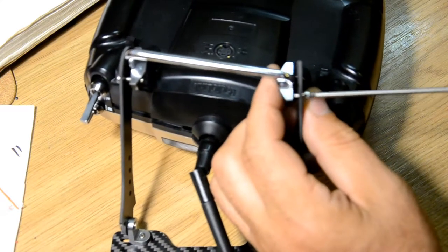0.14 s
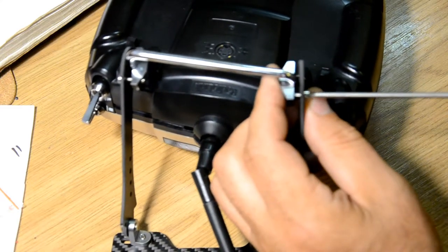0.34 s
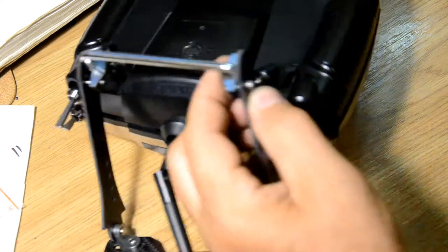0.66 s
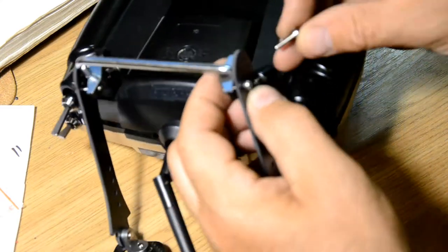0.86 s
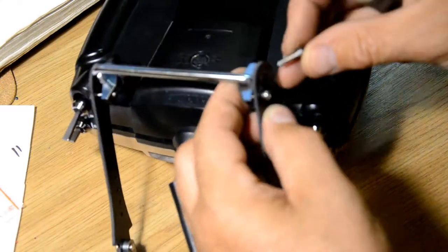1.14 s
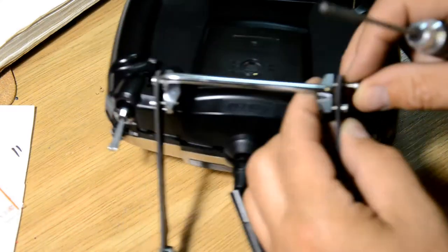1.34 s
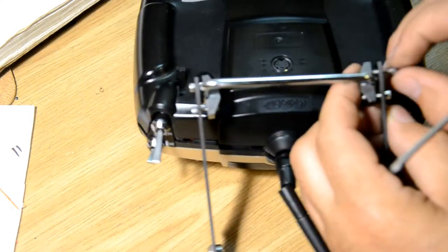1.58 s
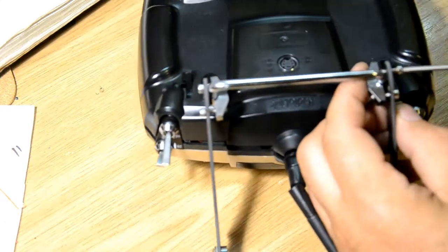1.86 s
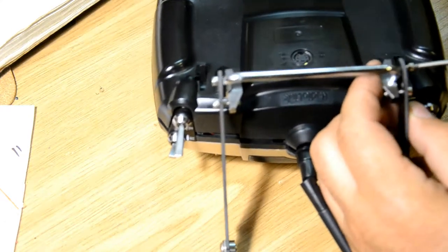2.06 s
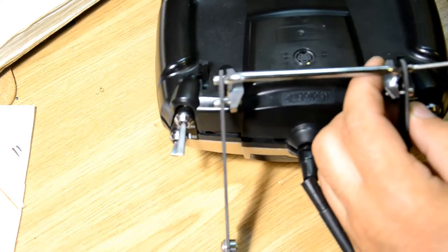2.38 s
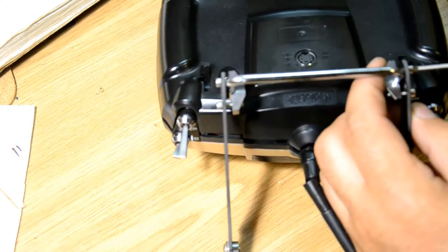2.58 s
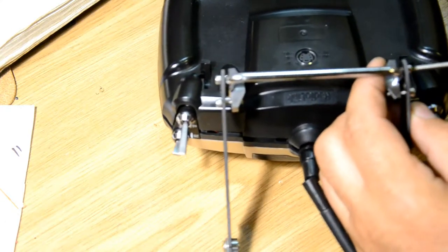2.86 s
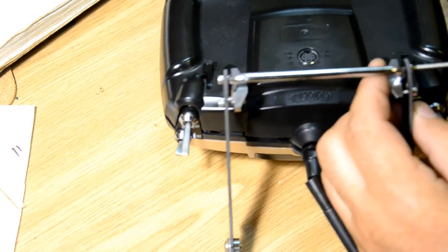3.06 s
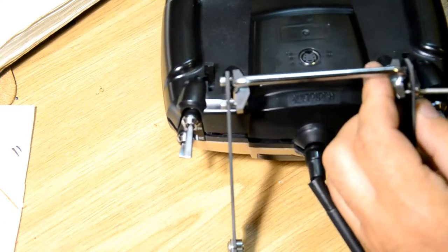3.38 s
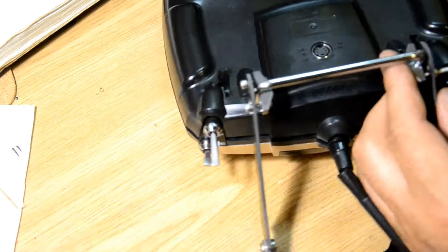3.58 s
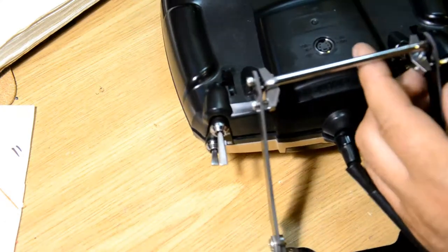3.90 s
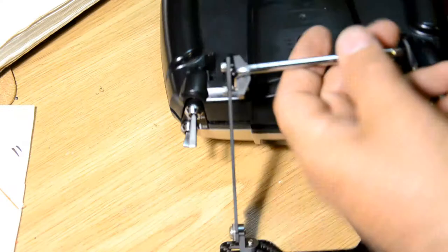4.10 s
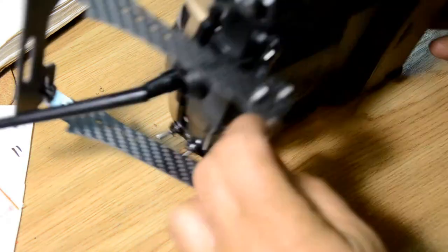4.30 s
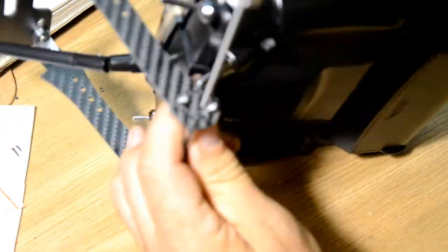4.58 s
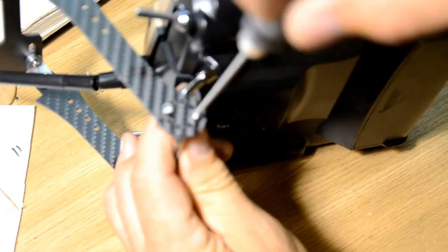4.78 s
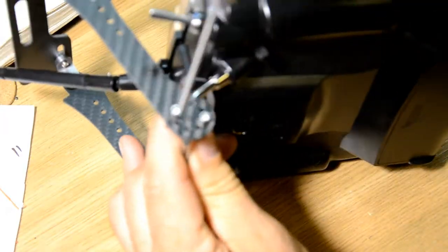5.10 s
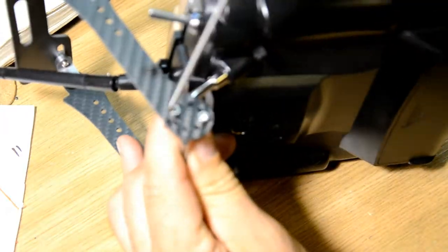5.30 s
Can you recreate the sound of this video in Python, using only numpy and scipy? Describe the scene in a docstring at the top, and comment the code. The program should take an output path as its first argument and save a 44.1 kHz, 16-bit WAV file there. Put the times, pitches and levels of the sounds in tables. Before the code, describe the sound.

A screwdriver ticks and scrapes on screws and a metal rod, and a plastic case knocks on a desk, with faint hiss underneath.

```python
"""Light taps and the rub of a tool along the hand are heard first: a screwdriver, screws and a bracket
rod are handled on a hollow plastic case on a desk. Each impact is a few milliseconds of chatter that
excites the modes of the case and ticks in the steel, which now and then rings briefly. A screw is driven
in by stick and slip, parts scrape, the case bumps on the desk, and a last sharp clack snaps brightly.
Under it all lie a low rumble and a dull, wavering hiss with a faint high whine."""
import sys
import numpy as np
from scipy import signal
from scipy.fft import rfft, irfft
from scipy.io import wavfile

SR = 44100
rng = np.random.default_rng(int(sys.argv[2]) if len(sys.argv) > 2 else 0)


def waveform_to_disk(signal):
    """Save audio, clipped to [-1, 1], as 16-bit WAV at the path in sys.argv[1]."""
    frames = np.transpose(np.atleast_2d(signal))
    scaled = np.clip(frames, -1, 1) * 32767
    samples = np.round(scaled).astype(np.int16)
    wavfile.write(sys.argv[1], SR, samples)


N = 240073
TIME, ALL_HZ = np.arange(N) / SR, np.fft.rfftfreq(N, 1 / SR)
SIZE = 4096  # samples in the frame of one impact; LAG is the time from its centre
LAG, HZ = (np.arange(SIZE) - SIZE // 2) / SR, np.fft.rfftfreq(SIZE, 1 / SR)
TO_10_MS = np.sqrt(.01 * SR / SIZE)  # gives a frame of rms 1 the energy of 10 ms at rms 1

# Distinct taps. Each row: time in seconds, spread in seconds, knock in dB, weight (low thump) and
# hardness (steel tick) in dB relative to the knock, two resonances of the spot touched in Hz.
TAPS = [(0.1175, 0.0018, -43.5, -20, -55, 810, 1060), (0.1864, 0.0034, -36.5, -35, -30, 780, 1570),
        (0.4354, 0.0022, -37, -37, -24, 1310, 1740), (0.5609, 0.002, -38.5, -16, -70.5, 720, 890),
        (1.3127, 0.0026, -45, -8, -37, 746, 1340), (1.335, 0.0041, -45, -8, -16.5, 970, 1830),
        (1.348, 0.0091, -45.5, -3, -19, 770, 1360), (1.436, 0.0045, -34, -19, -40.5, 520, 1210),
        (1.8137, 0.0043, -45, -29, -24, 990, 1190), (2.1832, 0.0061, -48, -4, -24, 584, 1070),
        (3.032, 0.0026, -44.5, -10, -31, 940, 1740), (3.0926, 0.0023, -45.5, -3.5, -34, 960, 1870),
        (3.486, 0.004, -50, 0, -38, 564, 700), (3.503, 0.003, -42, -10, -45, 593, 675),
        (3.5214, 0.0015, -50.5, -1, -30, 1650, 2340), (3.6045, 0.0011, -39, -30, -39, 1780, 1870),
        (3.609, 0.0019, -41, -29, -39, 710, 985), (3.6464, 0.0023, -47, -22, -46, 740, 1350),
        (3.772, 0.0021, -47.5, -24, -62, 775, 1130), (3.824, 0.003, -42, -15, -64, 500, 1360),
        (3.926, 0.0023, -46.5, -15, -60, 690, 990), (3.9462, 0.0021, -33, -18, -33.5, 1004, 1665),
        (3.952, 0.0023, -38, -21, -38, 1000, 1810), (4.058, 0.005, -43, 0.5, -47, 453, 990),
        (4.076, 0.0033, -34, -12, -37, 990, 1180), (4.082, 0.002, -39, -10, -43, 610, 1100),
        (4.1091, 0.002, -34, -4, -25.5, 610, 1500), (4.117, 0.0029, -33, -9, -29, 544, 1620),
        (4.1232, 0.0015, -24.5, -12, -32.5, 718, 1514), (4.1269, 0.0019, -26.5, -12, -33.5, 560, 1560),
        (4.137, 0.0025, -48, -6, -22, 850, 2450), (4.1468, 0.00088, -35.5, -8, -27, 910, 1420),
        (4.178, 0.005, -49, 2.5, -26, 700, 1410), (4.2695, 0.0011, -43.5, -6, -23.5, 1110, 1870),
        (4.2732, 0.0025, -39, -10, -29, 684, 1950), (4.477, 0.0043, -48, -9, -16.5, 600, 1470),
        (4.5259, 0.0046, -50, -5, -30, 1080, 1310), (4.695, 0.0028, -47.5, -4.5, -9, 556, 2070),
        (4.917, 0.0041, -54.5, -14, -18, 1110, 1500), (4.9422, .0054, -51.5, -5, -37, 1080, 1280),
        (5.1848, 0.0025, -44, -10, -33, 990, 1920), (5.225, 0.0023, -48.5, -7, -25.5, 675, 1260),
        (5.3226, 0.0017, -43.5, -5.5, -8, 950, 1290), (5.3296, 0.0024, -34, -29, -14, 1050, 1260),
        (5.333, 0.00094, -47, -13, -12, 1294, 1730), (5.421, 0.003, -47, -9, -47, 850, 1150)]
# Modes of the case. Each row: frequency in Hz, width in Hz, boost in dB.
CASE_MODES = [(101, 29, 9), (248, 38, 18), (541, 47, 5.5), (724, 34, 8), (988, 80, 5), (1270, 87, 7),
              (1570, 50, 5), (1696, 43, 8.5), (2106, 32, 7.5), (2340, 34, 10), (2394, 43, 12),
              (2730, 50, 8), (3250, 28, 1), (3800, 45, 0)]
# Spectra of the four parts of an impact and of the last clack's snap.
# Each row: frequency in Hz, relative density in dB.
THUMP_SPECTRUM = [(20, -34), (45, -7), (85, -2.5), (150, -17.5), (215, -8.5), (265, -7), (330, -2),
                  (420, -9.5), (900, -36), (3000, -75)]
KNOCK_SPECTRUM = [(100, -60), (330, -16), (480, -5), (950, -0.5), (1400, -7), (1850, -5), (2200, -12.5),
                  (4500, -74)]
CRACK_SPECTRUM = [(600, -26), (1700, 1.5), (2100, -25), (2900, 3), (3700, -3), (4500, -14.5), (6000, -27),
                  (12000, -77)]
TICK_SPECTRUM = [(1500, -39), (3800, 3.5), (5000, 4), (6000, -2), (8000, -1.5), (10300, -5), (11500, -6.5),
                 (13300, -11), (15500, -29)]
SNAP_SPECTRUM = [(4000, -30), (7000, -4), (10200, -2), (12000, -1), (14200, -1), (15500, -6)]
# The high snap of the last sharp clack. Each row: time in seconds, spread in seconds, level in dB.
CLACK_SNAP = [(5.3228, .0015, -53), (5.3285, 0.0019, -50), (5.333, 0.0015, -53)]
# The case meets the desk as it is tipped over and gripped. Each row: time in seconds, thud level in dB,
# thud frequency in Hz, boom level in dB, boom frequency in Hz.
BUMPS = [(4.079, -44, 100, -29, 226), (4.1255, -28, 92, -17, 248.4), (4.274, -34.5, 93, -32.5, 324),
         (4.524, -41, 118, -44, 250), (4.942, -45.5, 110, -50, 240)]
# Steel left ringing. Each row: start in seconds, level in dB, free t60 at 5 kHz in seconds, part.
RINGS = [(0.182, -51, 0.028, "bracket"), (0.432, -56, 0.051, "bracket"), (1.859, -61, 0.031, "bracket"),
         (2.174, -62, 0.033, "nut"), (2.239, -63, 0.028, "nut"), (3.178, -61.5, .03, "nut"),
         (3.484, -58.5, 0.027, "nut"), (3.9431, -20.5, 0.026, "arm"), (3.942, -51.5, 0.062, "screw"),
         (4.069, -48.5, 0.044, "nut"), (4.471, -50, 0.039, "rod"), (4.69, -55.5, 0.047, "blade"),
         (4.686, -55, 0.051, "screw"), (5.012, -58, 0.048, "bracket"), (5.017, -65, 0.076, "screw"),
         (5.326, -32.5, 0.019, "blade")]
# Partials of each steel part. Each row: frequency in Hz, relative level in dB.
STEEL_PARTIALS = {"screw": [(5275, 0), (8984, -8), (9170, -15), (9560, -4), (9790, -12), (10600, -12),
                  (10850, -12)], "nut": [(4774, 1), (5437, -6), (5900, -11), (8516, -10)],
                  "rod": [(4156, -9), (4800, -3), (5130, -0.5), (6810, 2), (8130, -7)], "arm": [(1000, -1),
                  (1680, 0.5), (1860, -8), (2350, -15.5)], "bracket": [(3046, 3), (3620, -9), (4080, -16)],
                  "blade": [(3260, 5.5), (4700, -8), (7000, -2), (7900, -4), (8128, 0.5), (9280, -1),
                  (10240, 1.5), (10730, -5), (13200, -12)]}
# Catches of the thread. Each row: time in seconds, spread in seconds, knock in dB, hardness in dB
# relative to the knock, grit in dB, two resonances of the spot touched in Hz.
CATCHES = [(1.996, 0.0038, -48, -31, -58, 740, 1350), (2.0245, .003, -45.5, -46, -57, 925, 1500),
           (2.061, 0.0036, -46, -36, -49, 970, 2450), (2.067, 0.0037, -43.5, -48, -51.5, 494, 1320),
           (2.118, .003, -52, -24.5, -71, 515, 1190), (2.197, .003, -52, -38, -57, 910, 1700),
           (2.31, 0.003, -54, -23, -62, 1010, 1600), (2.324, 0.0027, -45.5, -56, -51, 1100, 1640),
           (2.371, .0035, -50.5, -28, -59, 846, 1440), (2.423, 0.0052, -45.5, -44, -54, 980, 1320),
           (2.443, 0.0033, -56, -23, -66, 800, 1500), (2.513, 0.0023, -48, -39, -53, 626, 1210),
           (2.635, .003, -51.5, -28, -58.5, 520, 1770), (2.682, 0.0065, -50.5, -27, -66, 584, 1240),
           (2.7384, .002, -49.5, -32, -55, 684, 1100), (2.757, .003, -56.5, -19, -58, 950, 1520),
           (2.817, 0.0026, -54.5, -23, -59, 890, 1540)]
# Parts sliding over each other. Each row: start in seconds, length in seconds, level before the rasp
# in dB, boost of the rasp in dB, centre of the rasp in Hz.
SCRAPES = [(1.858, 0.02, -49, -7, 2700), (2.024, 0.046, -53, -8, 2700), (3.009, 0.05, -52, 0, 2500),
           (3.515, 0.059, -54, 3.5, 2200), (3.609, 0.023, -46, 3, 2400), (4.052, 0.02, -50, 8, 3800),
           (4.086, 0.027, -50.5, 9.5, 3200), (4.123, 0.03, -34.5, 5.5, 3800),
           (4.15, 0.021, -47.5, 12.5, 3100), (4.179, 0.081, -50, 2.5, 2900)]
# Grazes of the tool on screw and rod. Each row: time in seconds, spread in seconds, tick level in dB.
GRAZES = [(0.326, .003, -76), (0.372, 0.0022, -80), (1.467, 0.004, -76), (1.862, .003, -82),
          (2.538, .003, -80), (2.968, .003, -80), (3.428, 0.0037, -75), (4.602, 0.0041, -77),
          (4.774, .004, -75), (4.85, 0.0043, -78), (4.954, .004, -77)]
# Spectra of the friction sounds. Each row: frequency in Hz, relative density in dB.
GRIT_SPECTRUM = [(500, -19), (1000, 7), (1700, 3), (2500, -6), (3100, -15), (4200, -28), (8000, -45)]
SCRAPE_SPECTRUM = [(100, -18), (230, 8.5), (400, -1.5), (850, 7), (1500, 4), (2150, 0.5), (2700, 2),
                   (3400, -12.5), (4500, -20.5), (8000, -43), (15000, -40)]
# Play of the tip in the screw head. Each row: time in seconds, mean touches per second.
FIDGET_RATE = [(0, 3), (1.2, 3), (2.4, 14), (2.9, 4), (3.4, 5), (4.3, 5), (4.7, 12), (5.44, 10)]
# The tool is drawn along the hand. Each row: time in seconds, level in dB, lower resonance in Hz.
RUB_STROKE = [(0, -51.5, 860), (0.139, -52.5, 879.5), (0.308, -50.5, 1027), (0.471, -62, 1021),
              (.64, -55, 849), (0.851, -53.5, 919), (1.02, -76, 1000), (1.2, -85, 1000)]
# Background spectra and the hiss's middle band. Each row: frequency in Hz, relative level in dB.
RUMBLE_SPECTRUM = [(15, 4.5), (30, -14.5), (55, -4), (120, 2), (175, -3), (240, 0.5), (340, -10),
                   (600, -31), (2000, -77)]
HISS_SPECTRUM = [(180, -25), (300, -2), (324, -35), (367, -11), (450, -3.5), (560, -3), (697, -3.5),
                 (854, 0), (1170, -2.5), (1540, -9), (2180, -14), (3270, -26.5), (3590, -27.5),
                 (4190, -32.5), (12500, -67), (16200, -72), (22000, -120)]
AIR_SPECTRUM = [(2000, -18), (6000, -5), (12500, -9.5), (13500, -37), (14900, -30), (15300, -7),
                (16000, -10.5)]
MIDDLE_BAND = [(250, -42), (550, -6), (950, -0.5), (2000, 1.5), (2800, -6.5), (5000, -10)]
# Slow course of the rumble and of the hiss's middle band. Each row: time in seconds, gain in dB.
RUMBLE_LEVEL = [(0, -57.5), (1.0, -54.5), (2.7, -57.5), (4.55, -55.5), (5.1, -59)]
MIDDLE_SWELL = [(0, 1), (.45, 10), (.63, 3.5), (.83, 5.5), (1.05, 3.5), (2.0, 1), (3.8, 1), (4.649, 6),
                (5.44, 4)]
# Narrow background resonances. Each row: frequency in Hz, width in Hz, level in dB.
WHINES = [(141, 42, -68.5), (992, 66, -69.5), (1573, 23, -72.5), (3577, 170, -82), (4700, 220, -95.5)]


def taps():
    """Impact excitation: tool and parts strike the case, each blow centred on its time."""
    out = np.zeros(N)
    for s, *blow in TAPS:
        add(out, s + LAG[0], tap(*blow))
    return out


def tap(spread, knock_db, weight_db, hardness_db, *spot_hz, usual_knock_db=-37, rim_hz=2600):
    """A harder or stronger blow puts more energy into the crack of the edge; the rim resonates after it."""
    crack_db = knock_db - 6 + 0.37 * hardness_db + 0.076 * (knock_db - usual_knock_db)
    return impact(spread, knock_db + weight_db, knock_db, crack_db, knock_db + hardness_db,
                  *spot_hz, rim_hz)


def impact(spread, thump_db, knock_db, crack_db, tick_db, *spot_hz, spot_db=9, spot_width_hz=65):
    """Modal response to one touch: the case thumps and knocks, its edge cracks, the steel ticks."""
    spread = max(spread, .001)
    case = 1 + sum((amp(db) - 1) * bell(HZ, hz, width) ** 2 for hz, width, db in CASE_MODES)
    case *= ripple(HZ, depth_db=2, step_hz=110.4)  # every place on the shell favours other modes
    spot = 1 + sum((amp(spot_db) - 1) / (1 + 2j * (HZ - hz) / spot_width_hz) for hz in spot_hz)
    # steel on steel is brighter than on plastic: a tick above knock - 28 dB tilts the spectra upward
    bright_db = (tick_db - knock_db + 28) * np.log2((HZ + 1) / SR)
    thump = chatter(1.15 * spread, colour(THUMP_SPECTRUM, HZ) * case, snap=0.21)
    thump = np.roll(thump, int(.0005 * SR))  # the thump comes slightly late
    knock = chatter(spread, colour(KNOCK_SPECTRUM, HZ) * case * amp(.2 * bright_db), snap=0.086)
    crack = chatter(spread, colour(CRACK_SPECTRUM, HZ) * case, snap=0.051)
    thump, knock, crack = (irfft(rfft(part) * spot) for part in (thump, knock, crack))  # the spot rings on
    steel = ripple(HZ, depth_db=4.5, step_hz=227.6)  # each touch has its own crowd of short steel modes
    tick = chatter(spread, colour(TICK_SPECTRUM, HZ) * steel * amp(.17 * bright_db), snap=0.32)
    parts = [(thump, thump_db), (knock, knock_db), (crack, crack_db), (tick, tick_db)]
    return TO_10_MS * sum(amp(db) * unit_rms(part) for part, db in parts)


def chatter(spread, spectrum, snap):
    """Dense micro-impacts merge into a noise burst; snap (0-1) makes it rise faster than it falls."""
    u = LAG / spread + 1.5 * snap
    envelope = np.exp(-abs(u / (2.4 * (1 + snap * np.sign(u)))) ** 2.3)
    burst = rng.standard_normal(SIZE) * envelope
    for _ in range(4):  # so many impacts drive all frequencies about equally
        flat = np.exp(1j * np.angle(rfft(burst)))
        burst = irfft(flat * spectrum) * np.sqrt(envelope)
    return burst


def clack_snap():
    """Short bursts of high-frequency energy give the last sharp clack its bright, high snap."""
    out = np.zeros(N)
    for s, spread, db in CLACK_SNAP:
        tick = unit_rms(chatter(spread, colour(SNAP_SPECTRUM, HZ), snap=.4))
        add(out, s + LAG[0], amp(db) * TO_10_MS * tick)
    return out


def bumps(thud_s=0.0078, boom_s=0.0049):
    """Heavily damped vibration: the case rocks on the desk with a deep thud and a boom of its shell."""
    out = np.zeros(N)
    for (s, thud_db, thud_hz, boom_db, boom_hz), phase in zip(BUMPS, rng.random(len(BUMPS))):
        for db, hz, spread in [(thud_db, thud_hz, thud_s), (boom_db, boom_hz, boom_s)]:
            envelope = amp(db) * np.exp(-(LAG / spread) ** 2)
            add(out, s + LAG[0], envelope * np.sin(2 * np.pi * (hz * LAG + phase)))
    return out


def rings(rise_s=0.0019, buzz=0.26, buzz_hz=350):
    """Free vibration: steel parts ring and buzz briefly, then stop short."""
    t = np.arange(2 * SIZE) / SR
    rattle = unit_rms(1 + buzz * (waver(buzz_hz) + 1j * waver(buzz_hz)))
    attack = 1 - np.exp(-t / rise_s)
    ring = np.zeros(N, complex)
    for s, db, ring_s, part in RINGS:
        for hz, partial_db in STEEL_PARTIALS[part]:
            t60 = ring_s * (5000 / hz) ** 0.34  # higher partials die sooner
            abrupt_end = np.exp(-(t / (0.58 * t60)) ** 4)
            envelope = amp(db + partial_db - 60 * t / t60) * attack * abrupt_end
            add(ring, s, envelope * np.exp(2j * np.pi * (hz * t + rng.random())))
    return (ring * rattle).imag


def thread_catches(weight_db=-12):
    """Stick-slip friction: each catch of the screw's thread knocks the case and crunches."""
    out = np.zeros(N)
    for s, spread, db, hardness_db, grit_db, *spot_hz in CATCHES:
        knock = tap(spread, db, weight_db, hardness_db, *spot_hz)
        add(out, s + LAG[0], knock + amp(grit_db) * grit(1.9 * spread))
    return out


def grit(spread, slips_per_s=900, scatter_db=4):
    """Shot noise: a clump of tiny, uneven slips adds up to a crunch."""
    slips = rng.standard_normal(SIZE) * (rng.random(SIZE) < slips_per_s / SR)
    slips *= amp(scatter_db * rng.standard_normal(SIZE))
    clump = slips * np.exp(-(LAG / spread) ** 2)
    spectrum = colour(GRIT_SPECTRUM, HZ) * ripple(HZ, depth_db=1.5, step_hz=149)
    return TO_10_MS * unit_rms(irfft(rfft(clump) * spectrum))


def scrapes(grain_db=2.5, fade_db=5, rasp_width_hz=2200):
    """Sliding friction: grainy noise catches at once and eases off; a sharp edge colours it with a rasp."""
    out = np.zeros(N)
    friction = noise(colour(SCRAPE_SPECTRUM, ALL_HZ) * ripple(ALL_HZ, depth_db=2, step_hz=60))
    slide = unit_rms(friction * amp(grain_db * waver(240)))
    hz = np.fft.rfftfreq(4 * SIZE, 1 / SR)
    for s, length, db, rasp_db, rasp_hz in SCRAPES:
        progress = np.linspace(0, 1, int(length * SR))
        n = len(progress)
        stroke = slide[round(s * SR):][:n] * amp(db - fade_db * progress) * signal.windows.tukey(n, .3)
        rasp = amp(rasp_db * bell(hz, rasp_hz, rasp_width_hz) ** 2)
        add(out, s, irfft(rfft(stroke, 4 * SIZE) * rasp)[:n])
    return out


def grazes(grit_db=-61):
    """Glancing contact passes on little energy: steel brushes steel with a thin tick and a faint crunch."""
    out = np.zeros(N)
    for s, spread, db in GRAZES:
        spectrum = colour(TICK_SPECTRUM, HZ) * ripple(HZ, depth_db=4, step_hz=199)
        tick = TO_10_MS * unit_rms(chatter(spread, spectrum, snap=.3))
        add(out, s + LAG[0], amp(db) * tick + amp(grit_db) * grit(2 * spread))
    return out


def fidgets(thump_db=-70, knock_db=-58, crack_db=-73, tick_db=-87, scatter_db=5):
    """A Poisson process of tiny impacts: the tip fidgets in the screw head."""
    out = np.zeros(N)
    times = TIME[rng.random(N) < course(FIDGET_RATE) / SR]
    for s, (force, hardness, place) in zip(times, 2 * rng.random((len(times), 3)) - 1):
        force_db, hardness_db = scatter_db * force, scatter_db * hardness
        levels_db = thump_db, knock_db + force_db, crack_db + force_db, tick_db + hardness_db
        spot_hz = 850 + 240 * place, 1600 - 300 * place
        add(out, s + LAG[0], impact(0.0028, *levels_db, *spot_hz))
    return out


def rubbing(width_hz=370, upper_ratio=1.62, upper_db=-9, grab_db=2.5, grab_hz=45):
    """Friction drives two broad resonances that drift with the stroke; the skin grabs and lets go."""
    s, db, hz = np.transpose(RUB_STROKE)
    phase = 2 * np.pi * np.cumsum(np.interp(TIME, s, hz)) / SR
    band = bell(ALL_HZ, 0, width_hz) ** 3
    lower, upper = (noise(band) + 1j * noise(band) for _ in range(2))
    rub = lower * np.exp(1j * phase) + amp(upper_db) * upper * np.exp(1j * upper_ratio * phase)
    return amp(np.interp(TIME, s, db)) * unit_rms(rub.real * amp(grab_db * waver(grab_hz)))


def grip_rumble(peak_s=2.09, spread_s=0.28, hz=58, width_hz=35, level_db=-58):
    """Low resonant noise swells and fades as the hands shift their grip."""
    envelope = amp(level_db) * np.exp(-((TIME - peak_s) / spread_s) ** 2)
    return envelope * noise(bell(ALL_HZ, hz, width_hz) ** 2)


def room(direct, wet_db=-25, t60=0.34, dull_hz=3000):
    """Reverberation: reflections from desk and walls add a faint, short, dull tail."""
    t = np.arange(SR // 3) / SR
    tail = rng.standard_normal(len(t)) * amp(-60 * t / t60) * (t > .005)
    wet = signal.fftconvolve(direct, tail / np.linalg.norm(tail))[:N]
    return direct + amp(wet_db) * irfft(rfft(wet) * bell(ALL_HZ, 0, 2 * dull_hz) ** 2, N)


def background(hiss_db=-56, flutter_db=1.5, air_db=-84.5):
    """Filtered noise: rumble, a dull hiss whose middle swells and flutters, faint air and narrow hums."""
    rumble = amp(course(RUMBLE_LEVEL)) * noise(colour(RUMBLE_SPECTRUM, ALL_HZ))
    hiss = amp(hiss_db) * noise(colour(HISS_SPECTRUM, ALL_HZ) * ripple(ALL_HZ, depth_db=0.45, step_hz=30))
    middle = irfft(rfft(hiss) * colour(MIDDLE_BAND, ALL_HZ), N)
    swell = amp(course(MIDDLE_SWELL) + flutter_db * waver(35))
    air = amp(air_db) * noise(colour(AIR_SPECTRUM, ALL_HZ))
    whines = sum(amp(db) * noise(bell(ALL_HZ, hz, width) ** 2) for hz, width, db in WHINES)
    return rumble + hiss + (swell - 1) * middle + air + whines


def high_whine(hz=15702, line_width_hz=20, level_db=-86):
    """A narrow spectral line, heard as a thin, very high, steady whine."""
    phase = 2 * np.pi * np.cumsum(hz + line_width_hz * waver(25)) / SR
    return amp(level_db) * np.sqrt(2) * np.sin(phase)


def amp(db):
    """Amplitude ratio of a level in decibels."""
    return 10 ** (np.asarray(db) / 20)


def unit_rms(x):
    """Normalisation to rms 1."""
    return x / np.sqrt(np.mean(abs(x) ** 2) + 1e-30)


def course(points):
    """Linear interpolation of (seconds, value) points over the scene."""
    return np.interp(TIME, *np.transpose(points))


def colour(points, hz):
    """Gain of a spectrum interpolated on a log-frequency axis."""
    knots_hz, db = np.transpose(points)
    return amp(np.interp(np.log(hz + 1), np.log(knots_hz + 1), db))


def bell(hz, centre, width):
    """Magnitude response of one resonance."""
    return 1 / np.sqrt(1 + (2 * (hz - centre) / width) ** 2)


def ripple(hz, depth_db, step_hz):
    """Interference of reflections or crowded modes: irregular peaks and dips of gain over frequency."""
    knots = np.linspace(0, SR / 2, int(SR / 2 / step_hz))
    return amp(depth_db * np.interp(hz, knots, rng.standard_normal(SIZE)[:len(knots)]))


def noise(gain):
    """Stationary noise of rms 1, shaped by a gain per frequency."""
    return unit_rms(irfft(rfft(rng.standard_normal(N)) * gain, N))


def waver(rate_hz):
    """Low-pass noise: a random fluctuation of rms 1."""
    return noise(np.exp(-(ALL_HZ / rate_hz) ** 2))


def add(mix, s, sound):
    """Superposition of a sound on the mix from s seconds on."""
    start = round(s * SR)
    part = mix[max(start, 0):][:len(sound) + min(start, 0)]
    part += sound[max(-start, 0):][:len(part)]


def scene():
    """Superposition of the close handling sounds, their reverberation and the background."""
    handling = taps() + bumps() + thread_catches() + fidgets() + grazes()
    handling += clack_snap() + rings() + scrapes()
    return (room(handling) + rubbing() + grip_rumble() + background() + high_whine())[None]


def record(dry, cutoff_hz=15950):
    """Band limiting: a steep low-pass filter removes the highest treble."""
    low_pass = signal.firwin(1023, cutoff_hz, window=("kaiser", 9), fs=SR)
    return signal.oaconvolve(dry, low_pass[None], "same")


dry = scene()
out = record(dry)
waveform_to_disk(out)
```